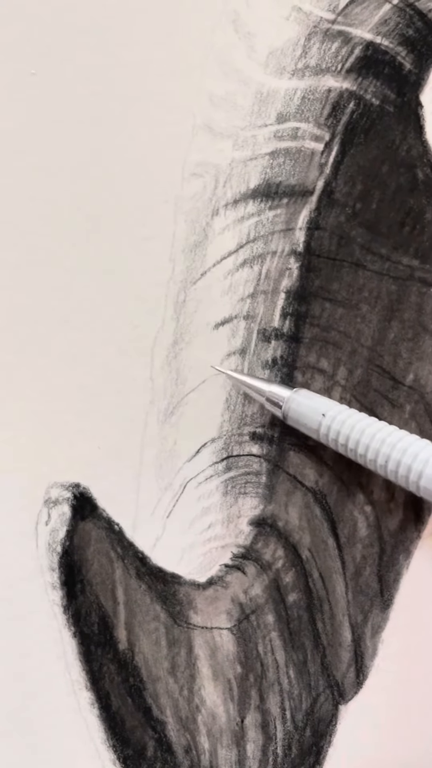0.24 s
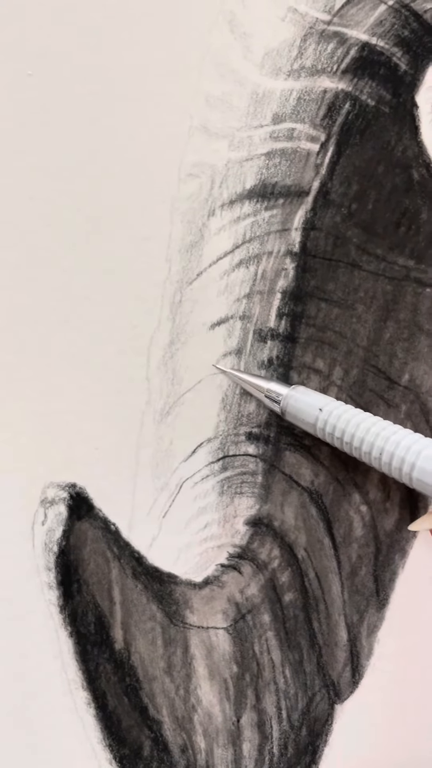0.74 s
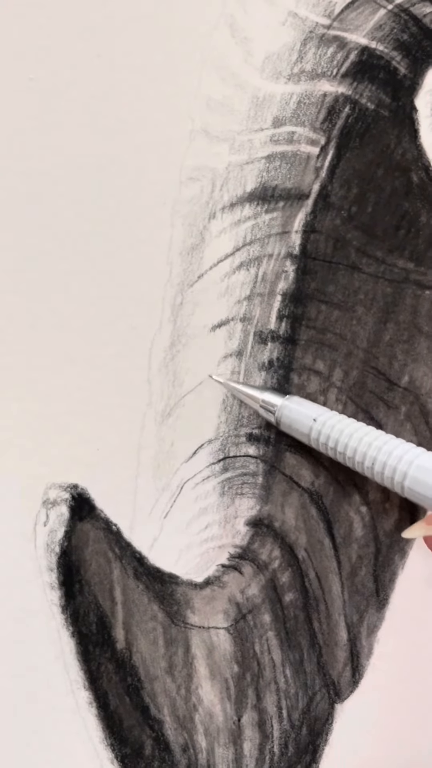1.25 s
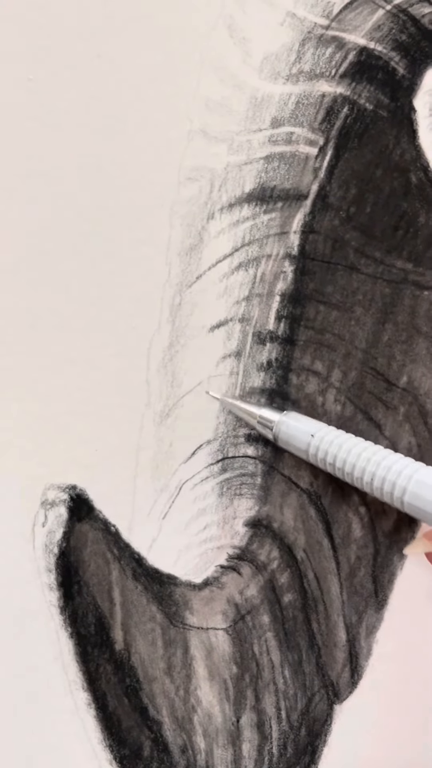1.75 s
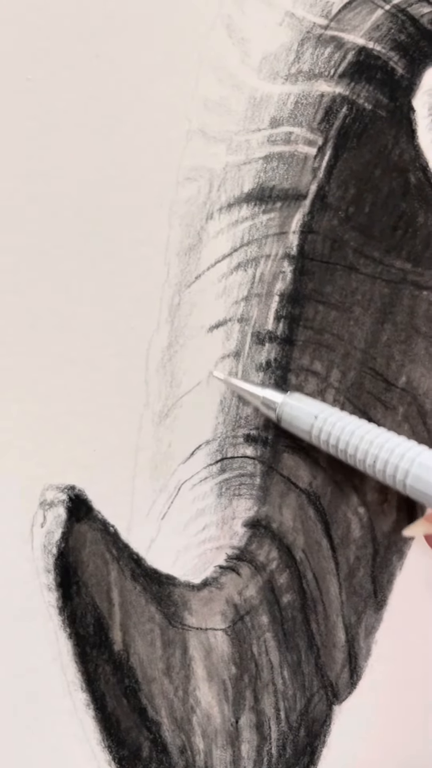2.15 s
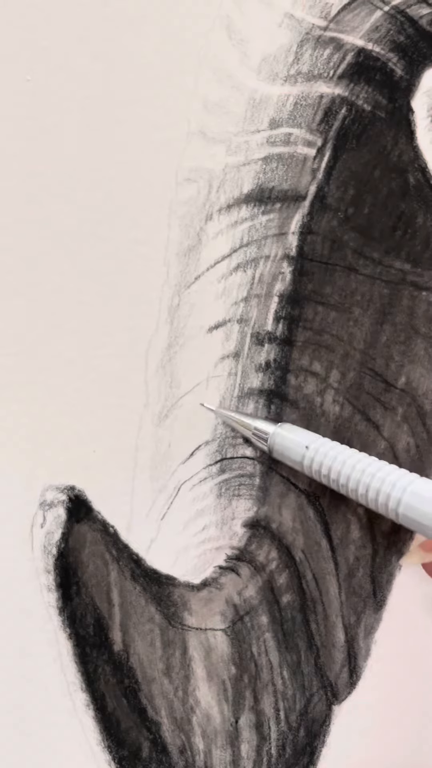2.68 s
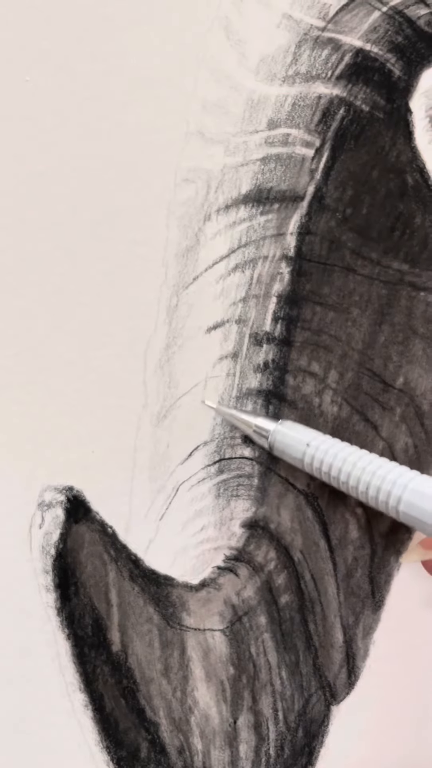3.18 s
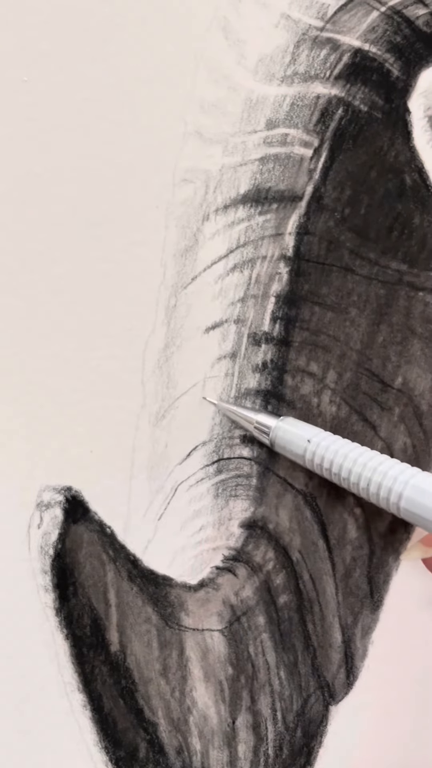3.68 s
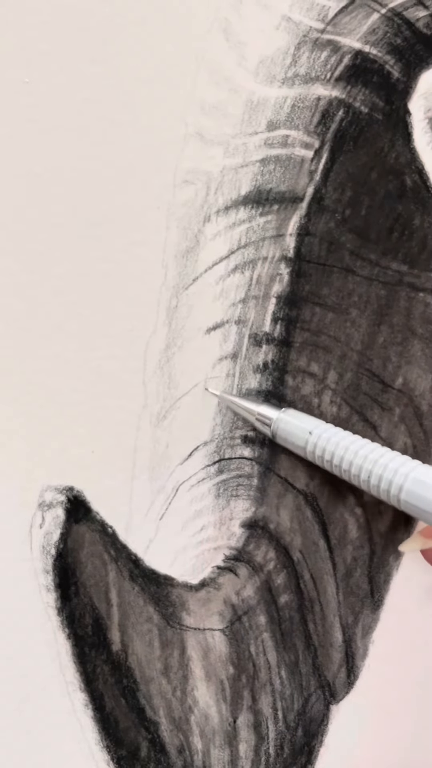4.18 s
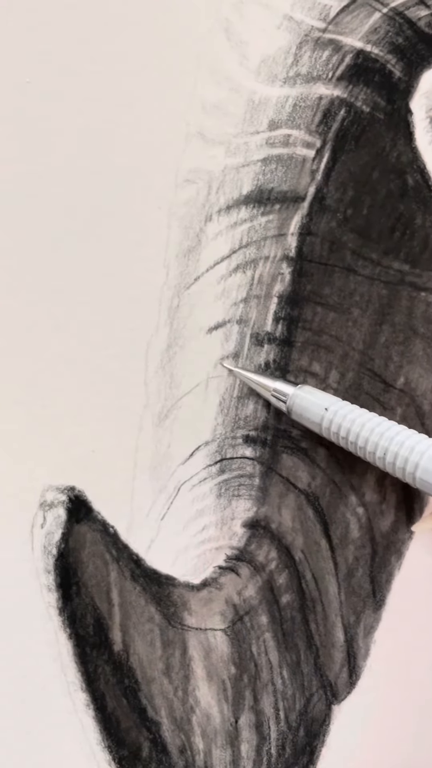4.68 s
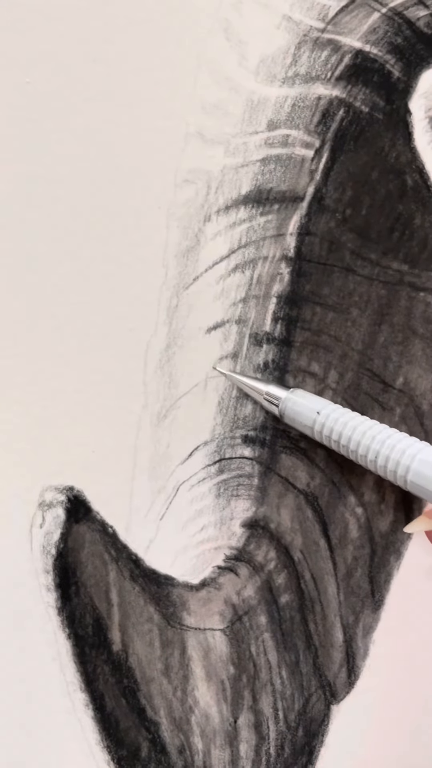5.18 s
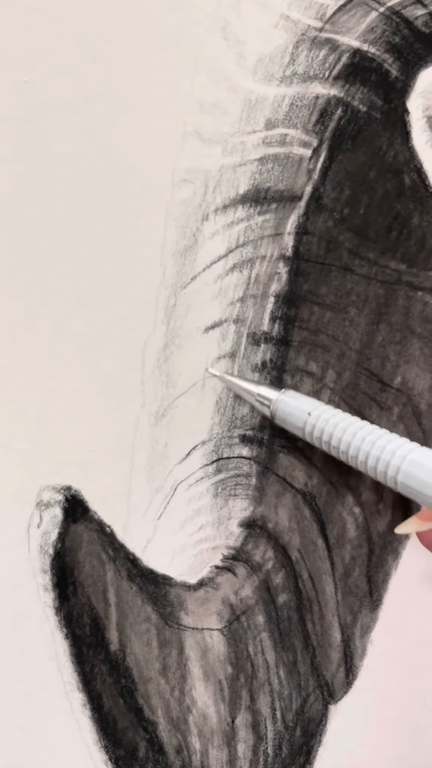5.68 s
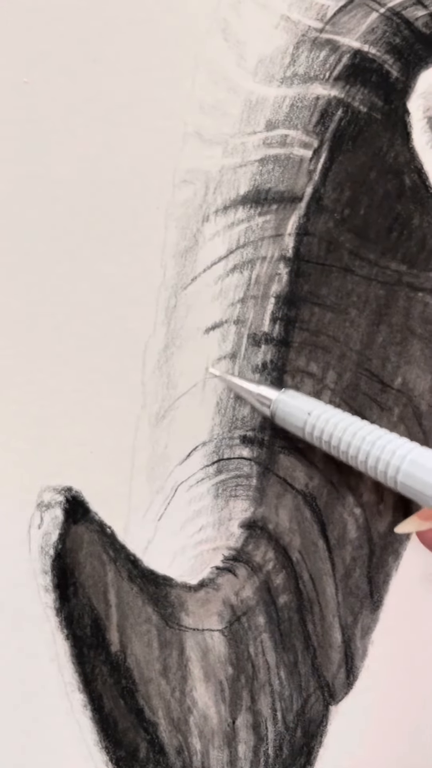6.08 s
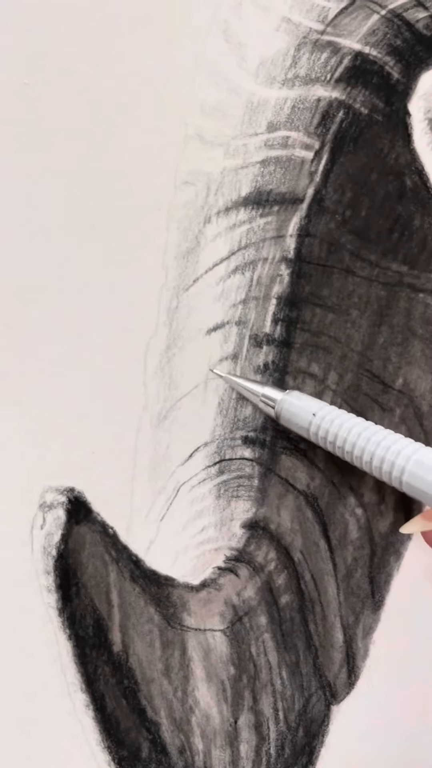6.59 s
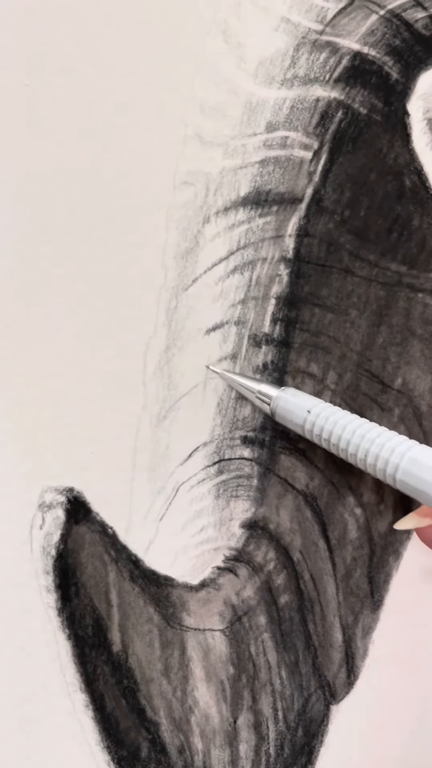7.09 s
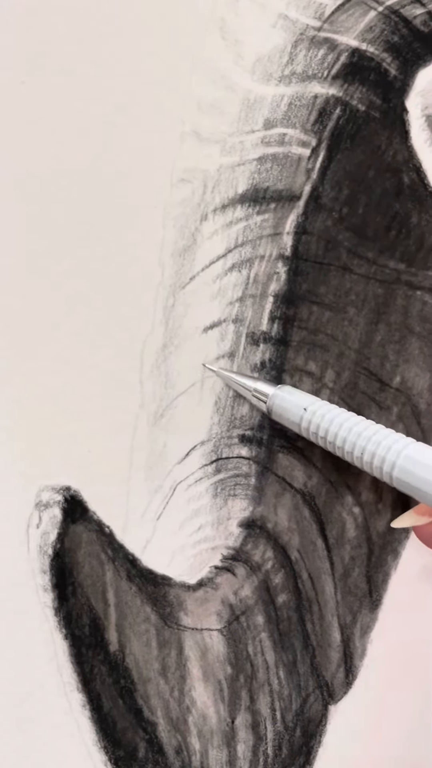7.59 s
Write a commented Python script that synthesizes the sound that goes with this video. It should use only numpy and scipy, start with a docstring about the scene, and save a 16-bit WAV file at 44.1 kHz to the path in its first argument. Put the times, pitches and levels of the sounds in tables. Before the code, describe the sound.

A quiet indoor room holds a steady, low ventilation hum, gently swelling, with very faint thin fan whine. For the first second only this is heard. Near 1.1 s a soft pencil stroke brushes the panel, a fainter one at 1.4, then a firmer cluster of dry, grainy scratches from 1.6 to 2.0 with sharp little ticks. A light touch at 2.3 leads to strong strokes at 2.6 and 2.8-2.9, then single swipes at 3.2, 3.4 and 3.55, some with a muffled board knock. After a barely audible graze at 4.0 comes a pause, the hum swelling around 4.6. Light quick strokes return at 4.9-5.1, firmer ones at 5.5 and 5.9, a bright one at 6.2. From 6.5 to 7.15 the hatching is rapid, starting with soft thuds and growing lighter; isolated scratches follow at 7.4 and 7.6, then hum. Close stereo, papery and slightly hollow, little reverberation.

```python
"""Pencil hatching on a drawing panel

A mechanical pencil hatches short strokes in a quiet room, close to a small stereo microphone.
Catches of the lead on the grain are noise-like clicks that excite resonances of panel and metal tip.
Air handling is coloured noise with low room modes; thin sine tones of the fan waver in pitch.
All is built as the sum (mid) and difference (side) of two ports, then turned into left and right."""
import sys
import numpy as np
from scipy import signal
from scipy.fft import rfft, irfft
from scipy.io import wavfile
from scipy.ndimage import uniform_filter1d

SR = 44100
rng = np.random.default_rng(int(sys.argv[2]) if len(sys.argv) > 2 else 0)


def inscribe(sig):
    """Save sig as 16-bit PCM at rate SR to the path in sys.argv[1].

    A 1-D sig is mono; a 2-D sig holds one channel per row.
    Samples are clipped to [-1, 1] before scaling.
    """
    pcm = np.round(np.clip(np.atleast_2d(sig).T, -1, 1) * 32767)
    wavfile.write(sys.argv[1], SR, pcm.astype(np.int16))


N = 346008
BODY_HZ = np.fft.rfftfreq(8192, 1 / SR)  # frequency grid of the ringing bodies

# bending modes of the panel: (frequency [Hz], width [Hz], relative level [dB])
PANEL_MODES = [(604, 90, -2), (667, 65, -14), (850, 85, -13), (1330, 65, -11), (1568, 110, -1.5),
               (2142, 37, -6), (2445, 130, -4.5)]
# mid response close by, with a narrow dip near 4.8 kHz and a broad one near 10 kHz:
# (frequency [Hz], relative level [dB])
NEAR_MID_RESPONSE = [(500, 7), (4400, 0), (4780, -11.5), (5000, -2), (8100, -3), (8400, -8), (9400, -10.5),
                     (10200, -20), (11000, -9.5), (12000, -5), (13700, -2.5), (14300, -9), (15000, -4.5)]


def gain_of(db):
    """Level law: 20 dB are a factor of ten in amplitude."""
    return 10 ** (np.asarray(db) / 20)


def evened(x):
    """Normalization: scales the signal to an rms of 1."""
    return x / np.sqrt(np.mean(x ** 2) + 1e-20)


def read(points, hz):
    """Linear interpolation of a table along a logarithmic frequency axis."""
    f, value = np.transpose(points)
    return np.interp(np.log(hz + 1), np.log(f + 1), value)


def peaks_power(modes, hz):
    """Resonance: each mode adds a Lorentzian peak to the power spectrum."""
    return sum(gain_of(db) ** 2 / (1 + (2 * (hz - f) / width) ** 2) for f, width, db in modes)


def partly_alike(like, mid, other):
    """Coherence: builds a side spectrum from a share of the mid and an unrelated remainder."""
    return like * mid + np.sqrt(np.maximum(1 - abs(like) ** 2, 0)) * other


def air():
    """Broadband flow noise: Gaussian spectra shaped by ventilation and by the room's low modes."""
    # ventilation noise in mid and in side: (frequency [Hz], power density [dB re 1/Hz])
    air_mid, air_side = [(20, -86.5), (50, -82), (90, -75), (200, -77), (400, -84), (650, -100),
                         (1300, -111), (2650, -116), (2900, -123), (5000, -128.5), (5700, -127),
                         (6100, -123), (6600, -129), (8400, -133), (9000, -149), (10700, -149),
                         (11300, -137), (13100, -136), (13800, -146), (15500, -147)], [(20, -114), (90, -99), (200, -90), (450, -89), (800, -101),
                                          (1100, -109), (1950, -123), (2350, -117), (3000, -124),
                                          (5600, -134), (6500, -131), (11000, -126), (13300, -146),
                                          (15500, -150)]
    # low modes of the room: (frequency [Hz], width [Hz], level in mid [dB])
    room_modes = [(64.86, 14, -51), (94.3, 12, -57.5), (118, 12, -48.5), (137.9, 16, -51), (158.8, 11, -54),
                  (270, 47, -62.5), (413, 15, -86), (574, 19, -80)]
    # mid-side likeness in step, negative where the rumble leans right: (frequency [Hz], likeness)
    lean = [(30, -0.26), (100, -.9), (400, -0.85), (550, -.75), (660, -.45), (900, -.1), (1300, -.1),
            (2000, 0.05)]
    # mid-side likeness a quarter turn apart: (frequency [Hz], likeness)
    lag = [(1500, 0.38), (5500, 0.034), (6000, 0.73), (8000, 0.68), (9700, -0.46), (12000, -0.15)]
    # swells and sags of the hum: (time [s], half length [s], level change [dB])
    surges = [(.33, 0.073, 2), (1.097, 0.14, 3.5), (1.79, 0.087, 5), (4.564, 0.061, 4),
              (5.233, 0.041, -3.5), (7.347, 0.056, 8.5), (7.598, .2, -2.5)]
    t, hz = np.arange(N) / SR, np.fft.rfftfreq(N, 1 / SR)
    a, b, c, d = rng.standard_normal((len(hz), 4)).T
    mid_power, side_power = (gain_of(read(points, hz)) ** 2 * hz[1] for points in (air_mid, air_side))
    modes_power = np.zeros(len(hz))
    for f, width, db in room_modes:
        peak = peaks_power([(f, width, 0)], hz) ** 2
        modes_power += gain_of(db) ** 2 * peak / peak.sum()
    modes_in_side_db = read([(60, -32.0), (130, -18), (300, -9.5), (600, -1.5)], hz)
    side_power += modes_power * gain_of(modes_in_side_db) ** 2

    like = np.clip(read(lean, hz), -1, 1) + 1j * read(lag, hz) * (hz > 1000)
    mid = a + 1j * b
    side = partly_alike(like, mid, c + 1j * d)
    spectra = np.array([mid * np.sqrt(mid_power + modes_power), side * np.sqrt(side_power)]) * N / 2

    hum_share = 1 / (1 + (np.log(hz / 125 + 1e-9) / 0.21) ** 8)  # the modes around 125 Hz
    swell_db = sum(db * np.exp(-((t - s) / half_s) ** 2) for s, half_s, db in surges)
    return irfft(spectra * (1 - hum_share), N) + irfft(spectra * hum_share, N) * gain_of(swell_db)


def wander(x, patchy_db):
    """Random spectral modulation: a travelling lead or stirring air drifts in patches of 30 ms by 700 Hz."""
    x = np.pad(x, [(0, 0), (0, 256)], "reflect", reflect_type="odd")
    spectra = signal.stft(x, nperseg=256, noverlap=192, boundary="odd", padded=False)[2]
    patches = rng.standard_normal(spectra.shape[:0:-1]).T  # the same for mid and side
    patches = uniform_filter1d(patches, size=4, axis=0)  # along frequency
    patches = evened(uniform_filter1d(patches, size=20, axis=1))  # along time
    return signal.istft(spectra * gain_of(patchy_db * patches), nperseg=256, noverlap=192)[1][:, :N]


def whines():
    """Frequency modulation: fan tones are sines whose pitch wavers slowly by 0.12 % rms."""
    # thin tones of the fan: (frequency [Hz], level in mid [dB rms])
    fan_tones = [(1052, -93), (1637.5, -89), (6185, -103)]
    t, out = np.arange(N) / SR, np.zeros(N)
    for hz, db in fan_tones:
        drift = evened(uniform_filter1d(rng.standard_normal(N), size=9000))
        wavering_t = t + .0012 * np.cumsum(drift) / SR
        out += np.sqrt(2) * gain_of(db) * np.sin(2 * np.pi * hz * wavering_t)
    return out * [[1], [.15]]  # mid, side


def tooth(catches_per_s, spread_db, clump_db):
    """Stick-slip on grain: dense clicks of uneven size in clumps, with two unrelated sets of signs."""
    hit, size, clump = rng.random(N), rng.exponential(1, N), rng.standard_normal(N)
    clumps_db = clump_db * evened(uniform_filter1d(clump, 150))
    sizes = (hit < catches_per_s / SR) * gain_of(spread_db * np.minimum(size, 4) + clumps_db)
    return evened(sizes * rng.standard_normal((2, N)))


def causal(gain):
    """Minimum phase: the folded cepstrum of a gain over frequency yields its impulse response."""
    cepstrum = irfft(np.log(gain + 1e-5))
    cepstrum[1:len(gain) - 1] *= 2
    cepstrum[len(gain):] = 0
    return irfft(np.exp(rfft(cepstrum)))[:len(gain)]


def ring(drive, power, whole=None):
    """Linear resonator: convolves a drive with a body's response, scaled to unit energy of the whole body."""
    colour = gain_of(read(NEAR_MID_RESPONSE, BODY_HZ))
    whole_power = power if whole is None else whole
    scale = np.linalg.norm(causal(np.sqrt(whole_power) * colour))
    response = causal(np.sqrt(power) * colour) / scale
    return signal.oaconvolve(drive, response[None], axes=1)[:, :N]


def stroke_forces():
    """Envelope of friction: each stroke is an arch in decibels, which the panel follows less deeply."""
    # strokes: (fastest moment [s], speeding up [s], slowing down [s], scratch drive level [dB],
    #           panel drive against the scratch [dB], squareness: 1 pointed, 2 round, more is flatter-topped)
    strokes = [ (1.108, 0.071, 0.13, -83.5, 14.5, 1), (1.37, 0.06, 0.037, -89, 16, 1.6),
               (1.615, 0.07, 0.065, -76.5, 12, 2.6), (1.768, 0.031, 0.036, -77.5, 13, 2.3),
               (1.905, 0.043, 0.056, -79.5, 11, 2.3), (1.975, 0.05, 0.052, -76, 10.3, 2.6),
               (2.339, 0.015, 0.04, -87.5, 14, 2.1), (2.571, 0.056, 0.1, -72.5, 9, 2.1),
               (2.787, 0.02, 0.017, -77, 14.7, 3.2), (2.872, .048, 0.046, -73.5, 8.9, 2.6),
               (3.165, 0.07, 0.052, -75, 8.2, 2.2), (3.409, 0.075, 0.066, -79, 9.6, 2.6),
               (3.562, 0.034, 0.025, -73.5, 11.2, 2.1), (3.99, 0.037, 0.047, -87.5, 4, 1.6),
               (4.9, 0.044, 0.034, -85.5, 12, 1.4), (5.005, .035, 0.043, -79.5, 12, 1.6),
               (5.1, 0.039, 0.03, -82.5, 11.7, 1.6), (5.33, 0.032, .03, -95, 7.3, 1.8),
               (5.54, 0.08, 0.054, -74, 11.4, 1.6), (5.658, 0.036, 0.02, -82.5, 10.7, 1.5),
               (5.864, 0.077, 0.12, -75, 10.6, 2.35), (6.085, 0.01, 0.013, -87.5, 24, 1.6),
               (6.167, 0.062, 0.039, -71.5, 8.8, 1.8), (6.546, 0.073, 0.043, -76.5, 12.3, 1.4),
               (6.648, 0.039, 0.048, -76, 9.5, 2.4), (6.73, 0.029, 0.038, -76.5, 12, 2.3),
               (6.82, 0.037, 0.068, -85, 10.5, 1.7), (6.955, .055, 0.045, -80, 12, 2.6),
               (7.055, 0.036, 0.052, -80.5, 10.2, 2.7), (7.146, 0.029, 0.036, -83, 15.4, 2),
               (7.387, 0.036, .04, -85, 13, 2), (7.582, 0.036, 0.028, -77.5, 8.7, 1.5), ]
    ends_db, panel_share = -21, 0.82  # drop one speeding-up or slowing-down time away; panel's share of it
    t = np.arange(N) / SR
    tip_force, panel_force = np.zeros(N), np.zeros(N)
    for top_s, rise_s, fall_s, level_db, ring_db, square in strokes:
        span = slice(round((top_s - 2 * rise_s) * SR), round((top_s + 2 * fall_s) * SR))
        away = np.maximum((top_s - t[span]) / rise_s, (t[span] - top_s) / fall_s)
        arch_db = ends_db * away ** square
        tip_force[span] += gain_of(level_db + arch_db)
        panel_force[span] += gain_of(level_db + ring_db + panel_share * arch_db)
    return tip_force, panel_force


def add_ticks(tip_drive, ping_drive, panel_drive, brush_drive):
    """Impact excitation: as the lead lands or snags, a dying chatter of noise strikes every body."""
    # ticks: (time [s], level [dB], panel drive against the tick [dB], finest treble against the tick [dB])
    ticks = [(1.116, -69, -1, -21), (1.548, -69, 10.5, -12), (1.554, -66, -2, -15.5),
             (1.6015, -59, -2, -26), (1.6243, -59.5, -4, -22), (1.7486, -65, 16, -16),
             (1.7537, -72, 2, -12), (1.769, -57.5, 7.5, -18), (1.7803, -59, 1, -19), (1.887, -70.5, -3, -7),
             (1.9227, -74, 17, -10), (1.9517, -63, 6, -17), (2.5473, -63, 5, 7.5), (2.651, -69.5, -1, -5),
             (2.776, -72, 4, -18), (2.784, -58, 16, -24), (2.8327, -70, 13, -6), (2.852, -60, 4, -6),
             (2.875, -57.5, -6, -22), (2.89, -70, 4, -13), (3.188, -55.5, -7, -11), (3.38, -67.5, 10, -8.5),
             (3.5396, -69, 8, -17), (5.5279, -62, 6, -8), (5.824, -71, -3, -8.5), (5.849, -60, 4, -10.5),
             (5.94, -66, 14, -10), (6.083, -65.5, 0, -8), (6.1406, -72, 0, -18), (6.5266, -72, -2, 0),
             (6.54, -63, -5, 0), (6.6255, -71, 3, -8), (6.6387, -67, 1, -11), (6.7242, -69, -2, -21),
             (7.031, -66, 4, -13), (7.5605, -69.5, 2, -19)]
    after = np.arange(300) / SR
    fade = gain_of(-60 * after / 0.018) * np.minimum(after / 0.00073, 1)
    bursts = rng.standard_normal((len(ticks), 2, len(after))) * fade
    for (s, level_db, ring_db, fine_db), burst in zip(ticks, bursts):
        span = slice(round(s * SR), round(s * SR) + len(after))
        tip_drive[:, span] += gain_of(level_db - 10.5) * burst
        ping_drive[:, span] += gain_of(level_db - 3) * burst[::-1]
        panel_drive[:, span] += gain_of(level_db + ring_db - 7.0) * burst
        brush_drive[:, span] += gain_of(level_db + fine_db - 5) * burst


def pencil():
    """Forced vibration: strokes and ticks drive the panel's low modes and the tip's high ones."""
    # modes of the metal tip: (frequency [Hz], width [Hz], relative level [dB])
    tip_modes = [(3300, 190, -8.5), (3800, 200, -6), (4220, 450, -2.5), (6000, 680, -3.5),
                 (7900, 1400, -14.5), (11000, 350, -4), (11600, 350, -2.5), (12750, 350, -1.5),
                 (13450, 300, -4.5), ]
    # the tip's strongest ring, woken mostly by firm strokes: (frequency [Hz], width [Hz], relative level [dB])
    ping_modes = [(5095, 260, 4.5), (5200, 170, -3)]
    # rasp between the modes: (frequency [Hz], relative level [dB])
    rasp_floor = [(500, -18.5), (1500, -25), (2700, -26.5), (3100, -17), (7000, -24), (10000, -23),
                  (13500, -24.5), (15500, -24)]
    # faint treble between strokes: (time [s], drive level [dB])
    brush_levels = [(0.0, -118), (.8, -114), (1.15, -103), (2.3, -111), (2.75, -102), (3.5, -103),
                    (4.1, -116), (5.4, -111), (6.0, -102), (6.35, -111), (6.85, -93), (7.4, -103),
                    (7.85, -108)]
    t, hz = np.arange(N) / SR, BODY_HZ
    tip_force, panel_force = stroke_forces()
    grain = tooth(11000, spread_db=1.9, clump_db=1.1)
    tip_drive, panel_drive = grain * tip_force, grain * panel_force

    # the ping loses 0.16 dB more for each dB that a stroke stays under the firm level
    firm_db, firm_slope = -76.5, 0.16
    force = abs(uniform_filter1d(tip_force, size=400))
    firm = np.minimum(force / gain_of(firm_db), 1) ** firm_slope
    ping_drive = tip_drive * rng.choice([-1., 1.], N) * firm  # the same catches, other signs
    brush_gain = gain_of(np.interp(t, *np.transpose(brush_levels)))
    brush_drive = tooth(14000, spread_db=5.0, clump_db=3.5) * brush_gain
    add_ticks(tip_drive, ping_drive, panel_drive, brush_drive)

    low = 1 / (1 + (hz / 2950) ** 16)  # crossover from panel to tip
    rasp = gain_of(read(rasp_floor, hz)) ** 2
    tip = (1 - low) * (peaks_power(tip_modes, hz) + rasp)
    ping = peaks_power(ping_modes, hz)
    light = gain_of(read([(5000, -11.0), (11000, 3.0)], hz)) ** 2  # a light touch favours the finest grain

    # as the lead travels it blends two spots, whose modes lie a little lower or higher
    shift = 0.021
    place = 2 * evened(uniform_filter1d(rng.standard_normal(N), size=2500))
    sound = np.zeros((2, N))
    for share, stretch in [(np.cos(place), 1 + shift), (np.sin(place), 1 - shift)]:
        panel = low * (peaks_power(PANEL_MODES, hz * stretch) + rasp)
        sound += ring(panel_drive * share, panel)
    sound += ring(tip_drive, tip, tip + ping)
    sound += ring(ping_drive, (1 - low) * ping, tip + ping)
    return sound + ring(brush_drive, light * (tip + ping))


def knocks():
    """Low-frequency forcing: each push is a soft 30 ms shudder that barely reaches the panel's upper modes."""
    # firm pushes that bend the panel: (time [s], level [dB])
    pushes = [(2.787, -62), (3.554, -62), (5.907, -64), (6.15, -57.5), (6.546, -57), (6.639, -57)]
    drive = np.zeros((2, N))
    shudders = rng.standard_normal((len(pushes), 2, 1300)) * signal.windows.tukey(1300, .6)
    for (s, level_db), shudder in zip(pushes, shudders):
        start = round(s * SR)
        drive[:, start:start + 1300] += gain_of(level_db - 3.0) * shudder
    band = 1 / (1 + (BODY_HZ / 950) ** 12) / (1 + (450 / (BODY_HZ + 1)) ** 8)
    return ring(drive, peaks_power(PANEL_MODES, BODY_HZ) * band)


def ports(near):
    """Interchannel coherence: turns two unrelated ringings of the same bodies into mid and side."""
    # side response close by: (frequency [Hz], relative level [dB])
    near_side = [(500, 3.5), (1600, -12.5), (2400, -7), (3500, -1.5), (3880, -11.5), (4500, 0.5),
                 (4900, -1), (5200, -9.5), (6800, -6.5), (9000, 7.5), (12900, -1), (13900, -25.5)]
    # how side follows mid in step: (frequency [Hz], likeness)
    near_lean = [(600, -.8), (1000, -.2), (1700, -.45), (2050, .3), (2500, 0), (3300, -.2), (3700, .15),
                 (4200, -.6), (4600, -.4), (4850, .3), (5400, -.75), (5900, 0)]
    # how side follows mid a quarter turn ahead: (frequency [Hz], likeness)
    near_lag = [(1000, .05), (1700, .3), (2400, .9), (3100, .45), (4550, .72), (5050, -.72), (5700, .6),
                (8100, .78), (8500, .35), (10300, -.25), (11200, -.88), (13500, -.92), (14000, 0)]
    hz = np.fft.rfftfreq(N, 1 / SR)
    mid, other = rfft(near)
    like = read(near_lean, hz) + 1j * read(near_lag, hz)
    side = partly_alike(like, mid, other)
    side_gain = gain_of(read(near_side, hz) - read(NEAR_MID_RESPONSE, hz))  # mid colour is already in
    return irfft([mid, side * side_gain], N)


def room(x):
    """Diffuse reverberation: sparse random reflections after 4 ms decay by 60 dB in 0.25 s."""
    t = np.arange(SR // 4) / SR
    signs = rng.choice([-1., 1.], (2, len(t)))
    taps = signs * (rng.random((2, len(t))) < .08) * (t > .004)
    tail = taps * gain_of(-60 * t / 0.25)
    return signal.oaconvolve(x, tail / np.linalg.norm(tail, axis=1, keepdims=True), axes=1)[:, :N]


def scene():
    """Superposition: pencil, its reflections, air and fan tones add, then mid and side become left and right."""
    background = wander(air(), patchy_db=0.87) + whines()
    near = ports(wander(pencil(), patchy_db=1.98) + knocks())
    mid, side = near + gain_of(-10.0) * room(near) + background
    return np.array([mid + side, mid - side])


def record(dry):
    """Band limitation: a linear-phase low-pass removes what lies above its edge."""
    edge_hz = 15690
    longer = np.pad(dry, [(0, 0), (511, 511)], "reflect", reflect_type="odd")
    low_pass = signal.firwin(1023, edge_hz, window=("kaiser", 9), fs=SR)
    return signal.oaconvolve(longer, low_pass[None], "valid")


dry = scene()
out = record(dry)
inscribe(out)
```